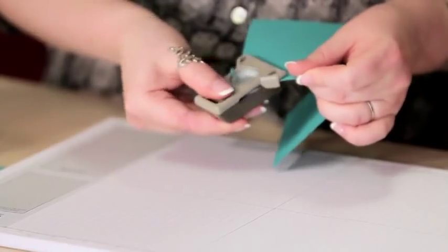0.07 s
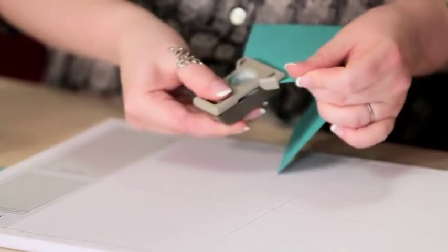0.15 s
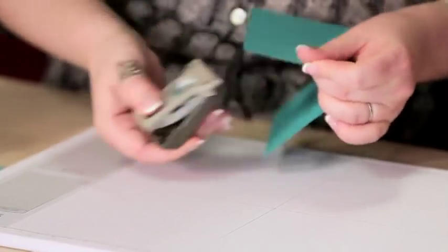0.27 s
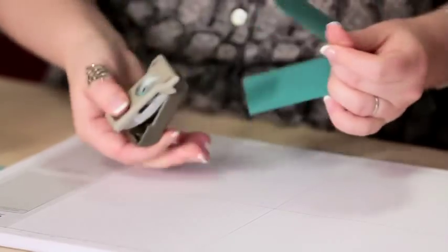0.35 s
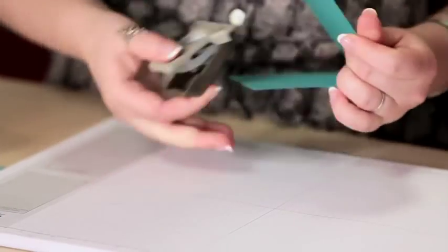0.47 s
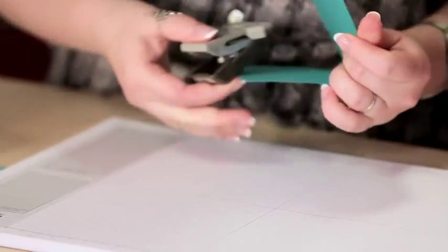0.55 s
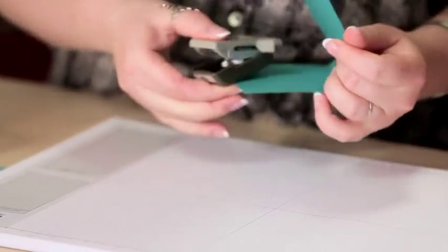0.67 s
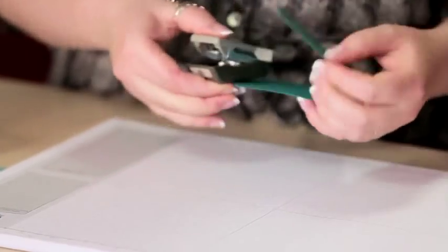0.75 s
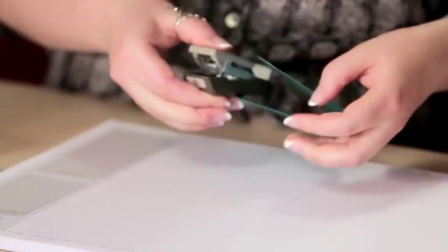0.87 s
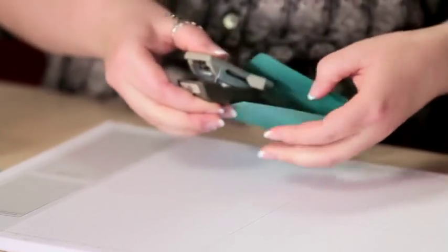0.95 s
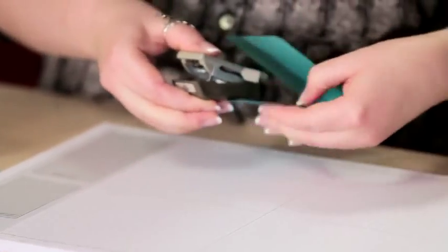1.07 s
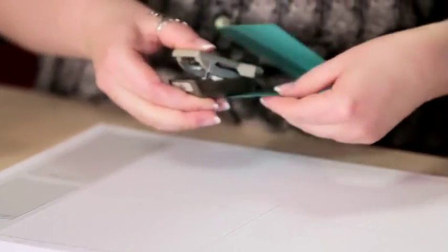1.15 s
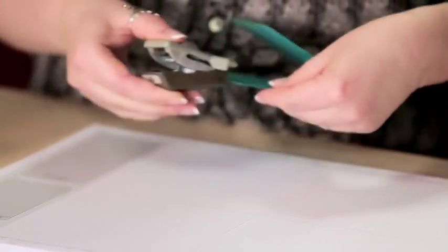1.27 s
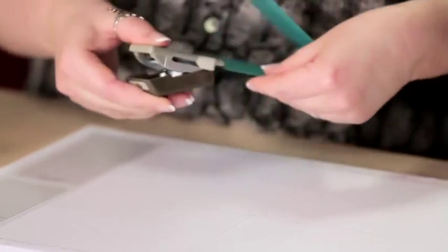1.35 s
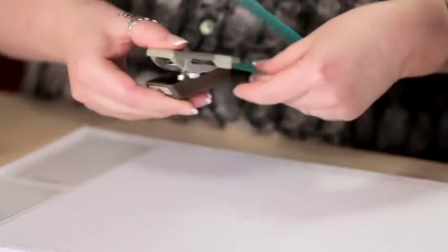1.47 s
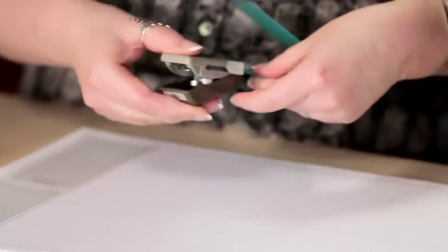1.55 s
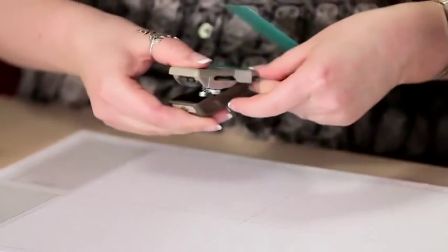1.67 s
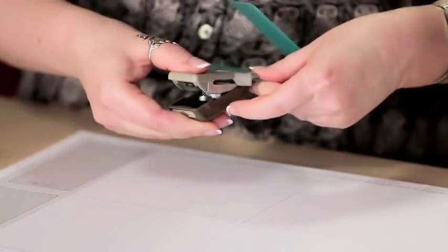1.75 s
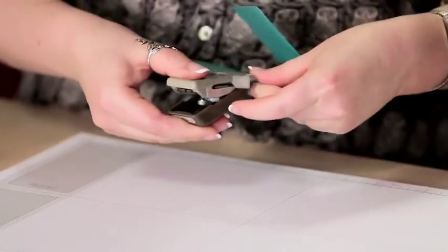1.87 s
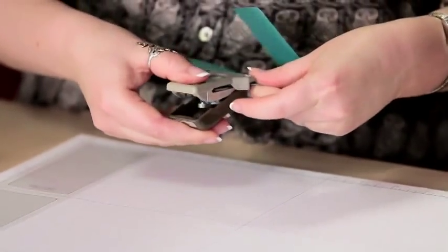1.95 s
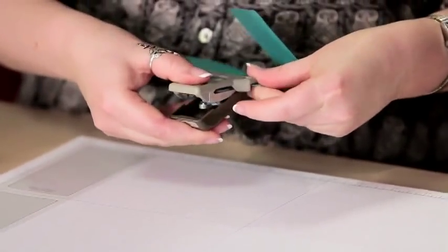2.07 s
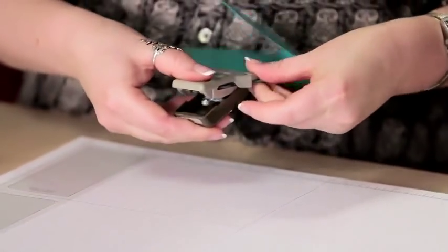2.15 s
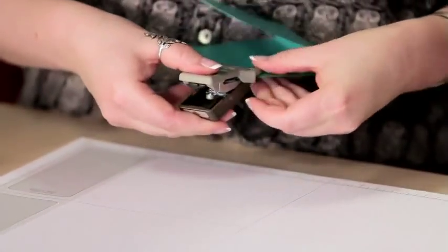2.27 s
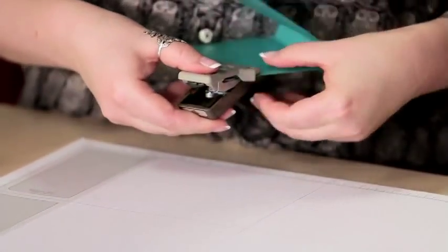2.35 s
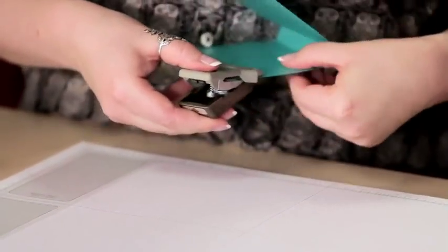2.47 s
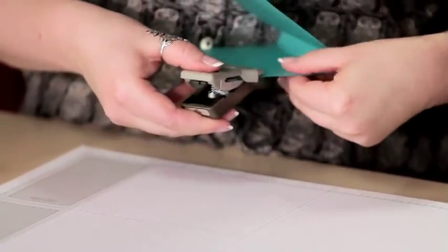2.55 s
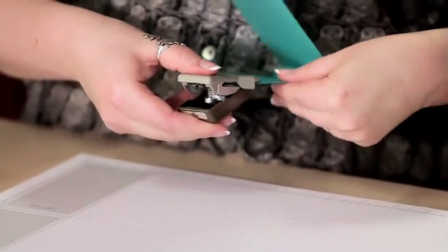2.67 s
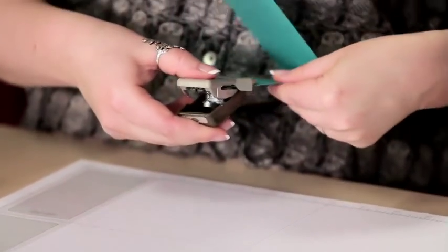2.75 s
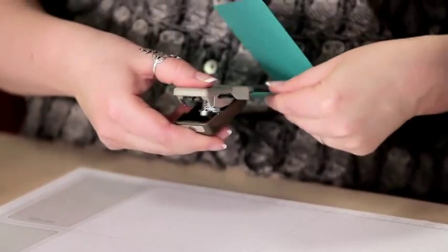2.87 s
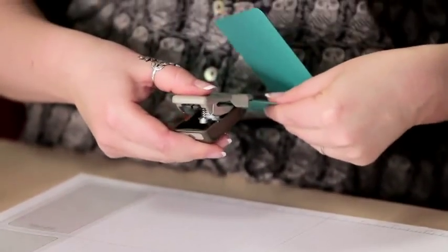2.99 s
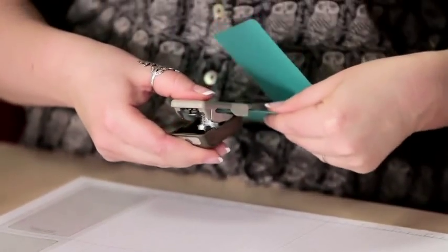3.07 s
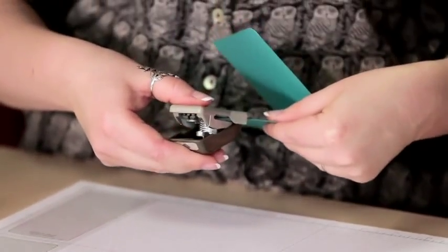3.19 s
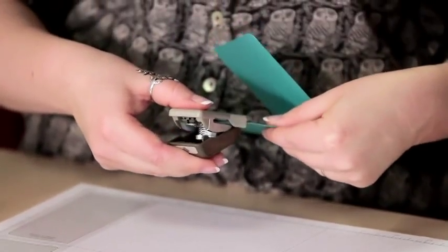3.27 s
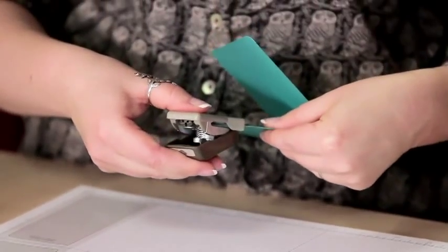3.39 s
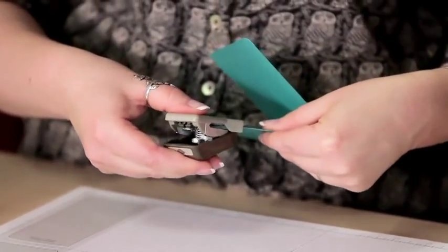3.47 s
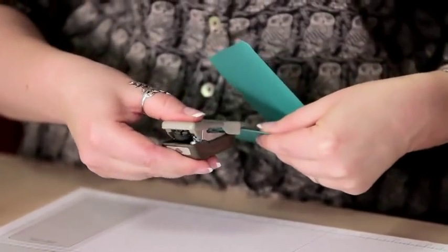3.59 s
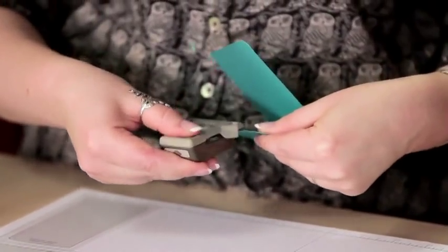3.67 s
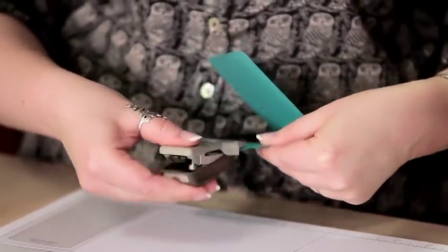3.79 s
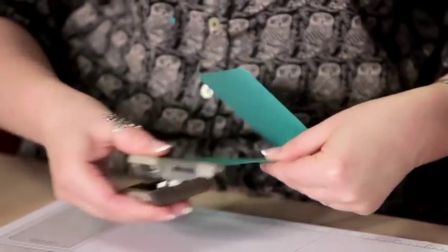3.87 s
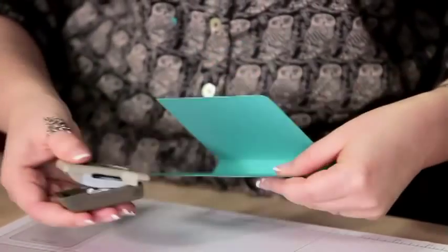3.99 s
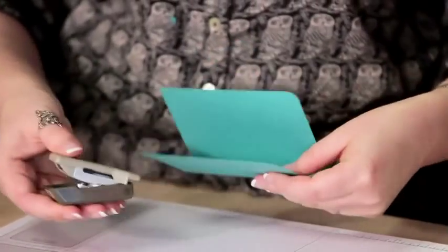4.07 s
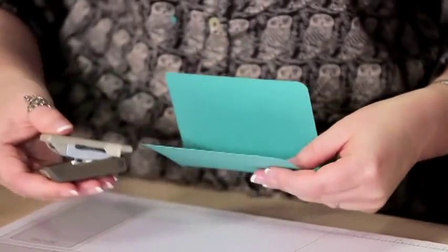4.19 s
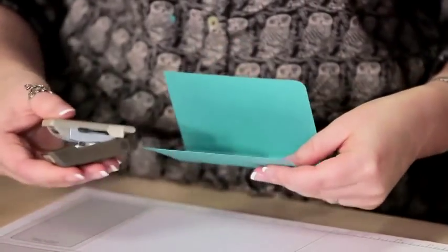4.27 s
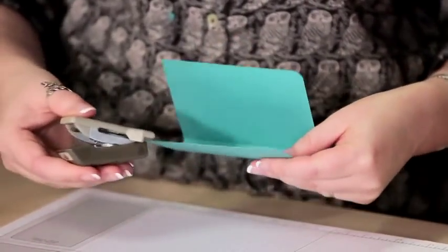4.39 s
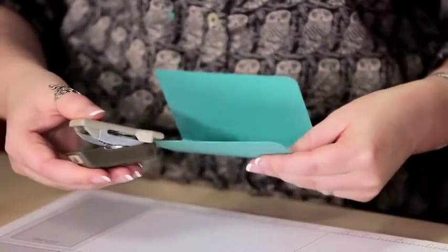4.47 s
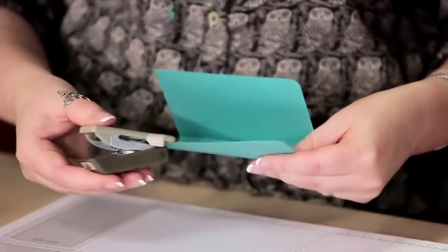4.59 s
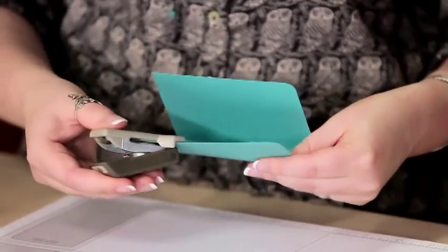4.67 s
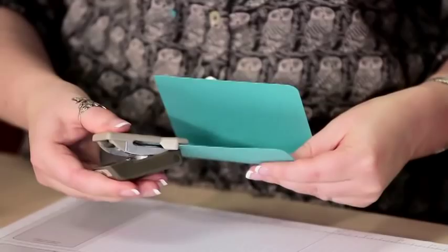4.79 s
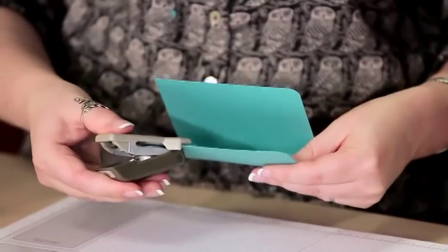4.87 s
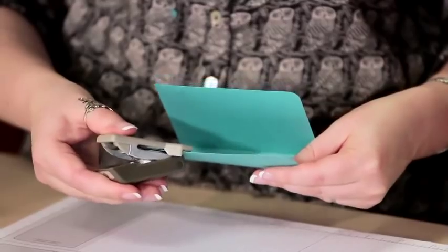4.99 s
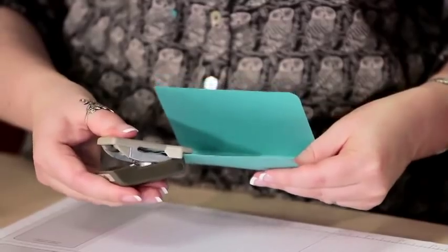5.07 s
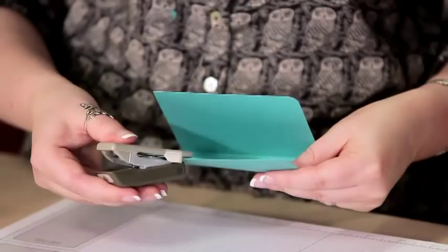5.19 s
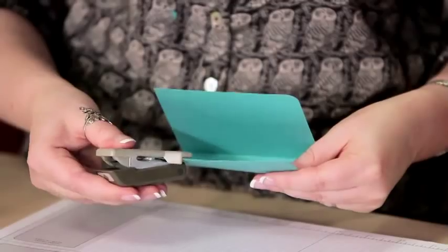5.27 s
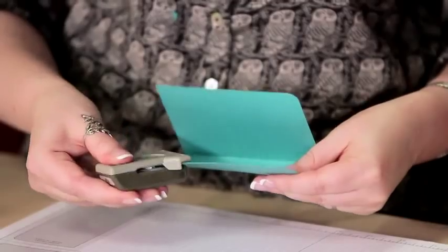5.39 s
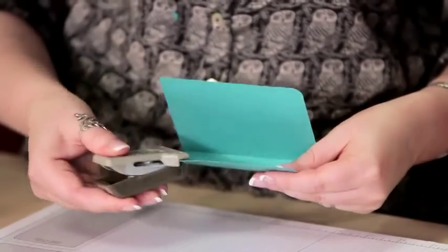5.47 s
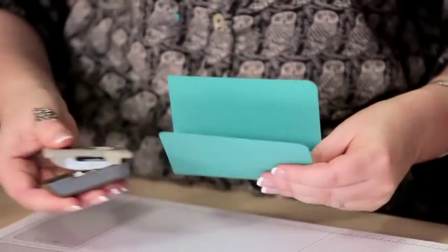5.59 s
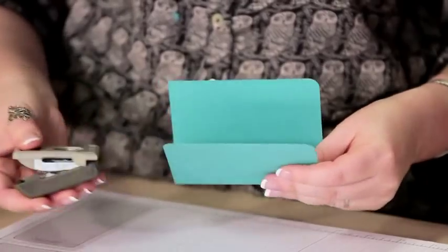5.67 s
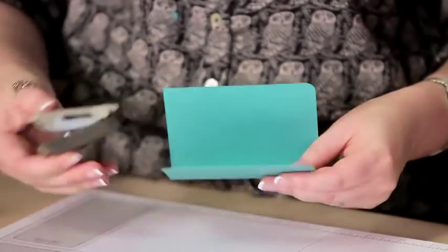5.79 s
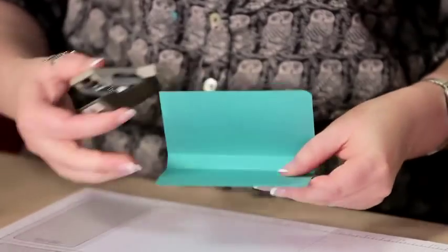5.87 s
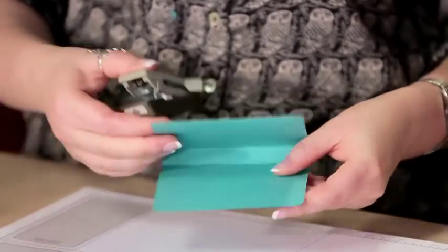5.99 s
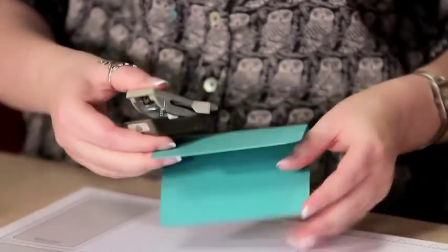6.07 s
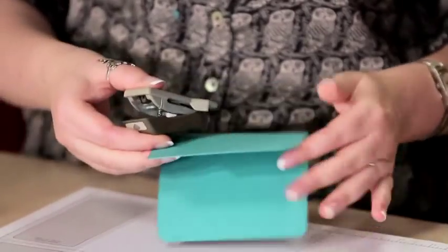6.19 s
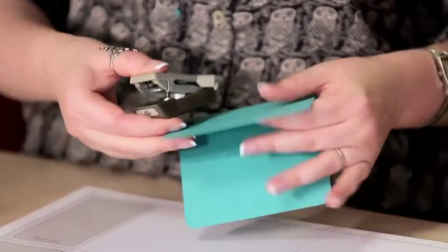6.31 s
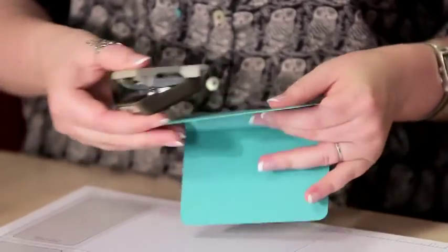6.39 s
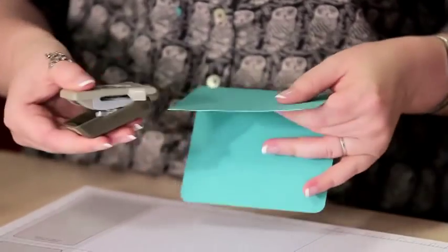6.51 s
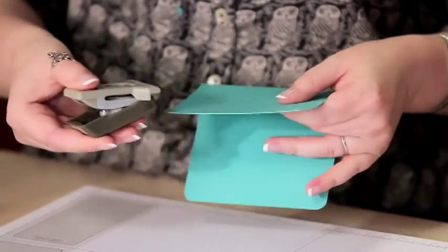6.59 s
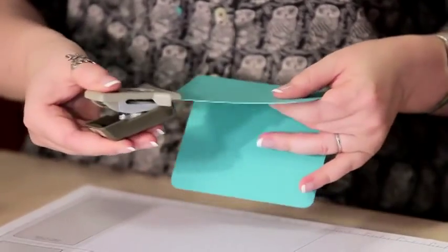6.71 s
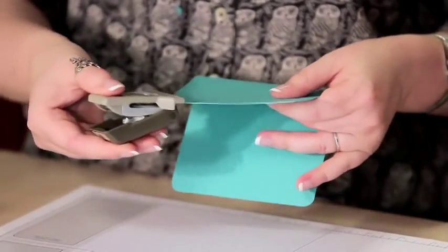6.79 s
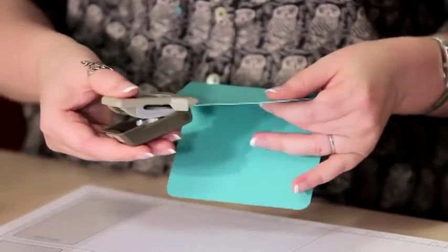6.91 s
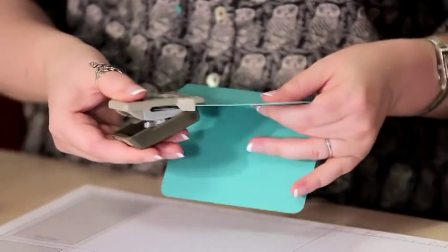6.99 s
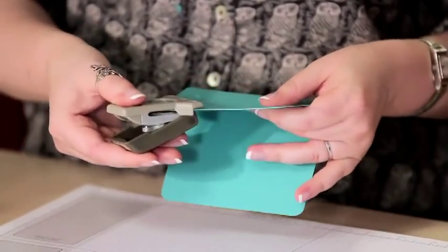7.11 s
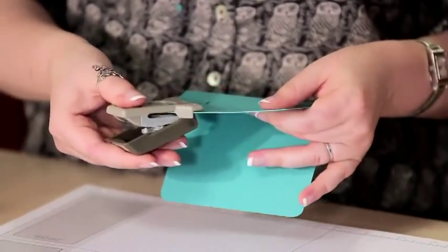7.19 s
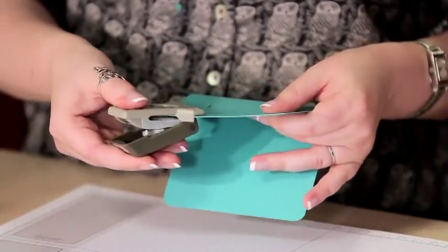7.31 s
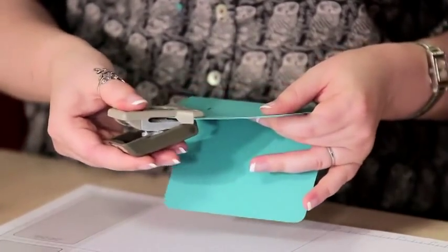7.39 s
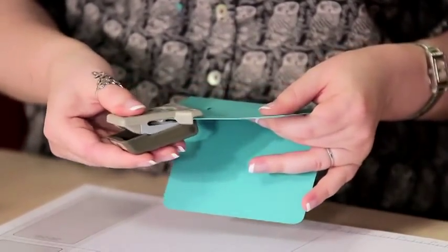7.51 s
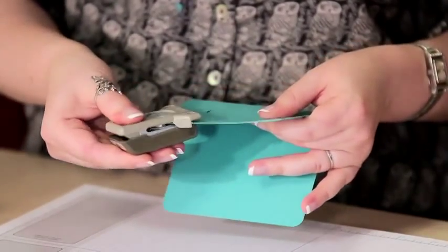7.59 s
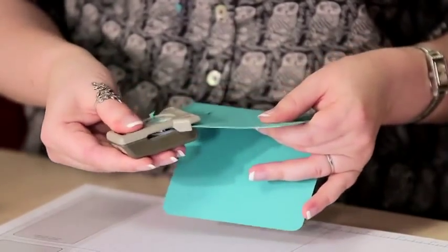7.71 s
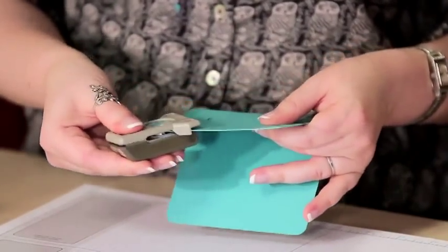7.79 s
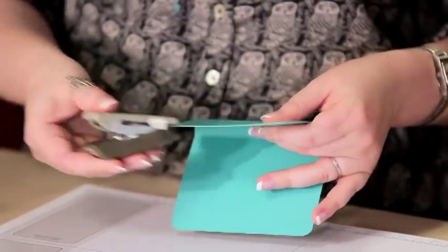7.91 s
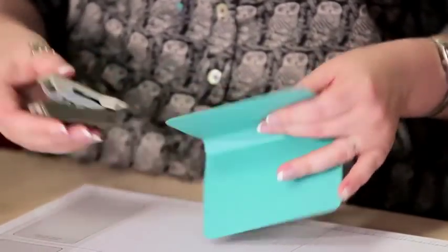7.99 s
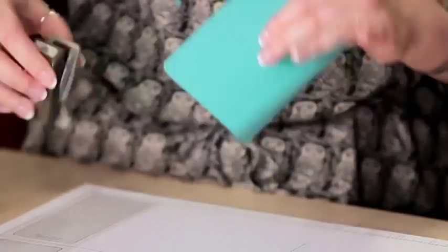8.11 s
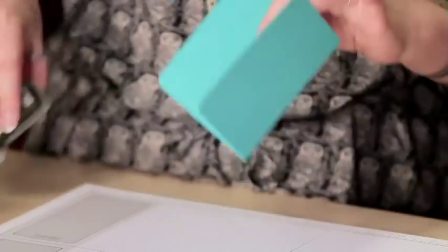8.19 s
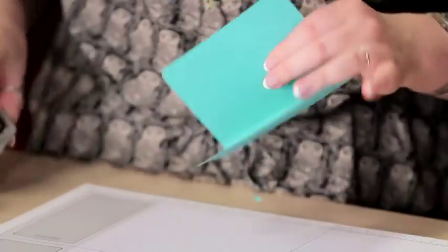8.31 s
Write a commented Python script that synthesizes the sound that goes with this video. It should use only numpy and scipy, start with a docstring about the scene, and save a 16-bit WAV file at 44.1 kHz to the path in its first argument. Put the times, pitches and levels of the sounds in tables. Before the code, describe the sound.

Very close in a quiet room, a small metal punch crunches and snaps at once, then card taps, scrapes and rustles softly in the hands. After a near-silent pause come a sharp single snap, later a two-stage crunch and the loudest snap, busier card knocking, and a last gritty cluster of cuts before quiet handling.

```python
"""A hand-held corner punch bites the corners off a folded card, close to the microphone in a quiet room.
The die crunches through the card and the lever snaps home: bursts of grit with a hard click ring the punch's modes.
Between cuts the card taps and the lever creaks (softer bursts); the card scrapes in the slot (clumped grit).
Fingers slide over the card (two bands of wavering noise) with small ticks.
Behind them lie a short room reverberation and a steady, low room tone."""
import sys
import numpy as np
from scipy import signal
from scipy.fft import rfft, irfft
from scipy.io import wavfile
from scipy.ndimage import uniform_filter1d

SR = 44100
rng = np.random.default_rng(int(sys.argv[2]) if len(sys.argv) > 2 else 0)


def digitize_waveform(pressure):
    """Quantize a signal to 16-bit integers and store it at the path in sys.argv[1].

    Rows of a 2-D input are taken as channels; values are limited to [-1, 1].
    """
    field = np.atleast_2d(pressure).T
    bounded = np.clip(field, -1, 1)
    quanta = np.round(bounded * 32767).astype(np.int16)
    wavfile.write(sys.argv[1], SR, quanta)


N = 368131   # length in samples


def from_db(db):
    """Gain of a level in dB."""
    return 10 ** (np.asarray(db) / 20)


def at_hz(points, hz):
    """Read a (Hz, value) table on a log-frequency axis."""
    table_hz, values = np.array(points).T
    return np.interp(np.log(hz), np.log(table_hz), values)


def rms_one(x):
    """Scale to rms 1."""
    return x / np.sqrt(np.mean(x ** 2) + 1e-20)


def grit(size, spread_db):
    """Dense tiny contacts of uneven strength."""
    return rng.standard_normal(size) * from_db(spread_db * rng.standard_normal(size))


def coloured(x, spectrum):
    """Give a signal the spectrum above 15 Hz; rms 1."""
    hz = np.maximum(np.fft.rfftfreq(N, 1 / SR), 1)
    gain = from_db(at_hz(spectrum, hz)) * (hz > 15)
    return rms_one(irfft(rfft(x) * gain, N))


def drift(rate_hz):
    """Slow random wandering with spread 1, drawn 200 times a second and smoothed."""
    steps = rng.standard_normal(int(N / SR * 200) + 2)
    lowpass = signal.butter(2, rate_hz, fs=200, output="sos")
    slow = rms_one(signal.sosfiltfilt(lowpass, steps))
    return np.interp(np.arange(N) / SR * 200, np.arange(len(slow)), slow)


def add(track, sound, at):
    """Mix a sound into the track from sample at."""
    track[at:at + len(sound)] += sound[:N - at]


# The punch in the hand with the card in it, as ringing modes.
# Each row: frequency in Hz before the grip shifts it, level in dB before the contact's colour,
# t60 in seconds at damping 1.
BODY = [(163, -7.5, 0.052), (293, -1, 0.016), (486, 1.5, 0.02), (745, -0.5, 0.014), (1110, -5, 0.014),
        (1604, 0.5, 0.0043), (1898, 1, 0.0073), (2237, -2.5, 0.0073), (2644, -1.36, 0.009),
        (2856, -5, 0.0069), (4066, -0.5, 0.0027), (5080, -3, 0.0029), (5844, -1.5, 0.0042),
        (7250, -2, 0.0036), (7726, -1, 0.0037), (9430, -7.5, 0.013), (10350, -6.5, 0.0055),
        (11640, -1.5, 0.00068), (13900, -4, 0.0017)]
# Where a contact's colour is set, in Hz: thud, bass, middle, edge, treble and top.
COLOUR_HZ = [400, 1100, 2300, 4600, 7600, 13000]
TREBLE_DB, TOP_DB = -3, -6   # relative to the brightness, which sets the edge
SPRING_HZ, SPRING_WIDTH_HZ = 7680, 840   # where the spring rings


def body(forces, colour, chance_db, damping):
    """Each mode rings on its own force and takes a share of the energy set by the colour of the contact."""
    thud_db, bass_db, bright_db, *spring_db = colour   # the spring is optional
    colour_db = [thud_db, bass_db, 0, bright_db, bright_db + TREBLE_DB, bright_db + TOP_DB]
    tilt = list(zip(COLOUR_HZ, colour_db))
    out = 0
    for k, (hz, db, t60) in enumerate(BODY):
        hz = hz * (1 + .025 * rng.standard_normal())   # the grip shifts each mode a little
        radius = from_db(-60 * damping / (t60 * SR))
        angle = 2 * np.pi * hz / SR
        ringing = signal.lfilter([1, 0, -1], [1, -2 * radius * np.cos(angle), radius ** 2], forces[k])
        spring_share = np.exp(-((hz - SPRING_HZ) / SPRING_WIDTH_HZ) ** 2)
        level_db = db + at_hz(tilt, hz) + spring_share * sum(spring_db) + chance_db * rng.standard_normal()
        sign = (-1) ** k
        out = out + sign * from_db(level_db) * rms_one(ringing)
    return out


def blows(rows, click_db, softening):
    """A burst of grit builds up to one hard click and dies away, the treble first."""
    out = np.zeros(N)
    before = 441   # samples ahead of the click
    ms = np.arange(-before, 2205) / SR * 1000
    quickness = (np.array(BODY)[:, :1] / 2300) ** softening   # higher modes lose their force sooner
    for s, peak_db, *colour, rise_ms, fall_ms in rows:
        rise = np.clip(1 + ms / np.clip(rise_ms, .2, 10), 0, 1)
        started = np.where(rise > 0, 1.1 + 0.2 * rise ** 2, 0)   # the first touch is abrupt
        shapes = started * np.exp(-quickness * np.maximum(ms, 0) / max(fall_ms, .2))
        force = grit(len(ms), spread_db=4) + from_db(click_db) * (ms == 0)
        sound = body(shapes * force + 1e-18, colour, chance_db=2, damping=1)
        add(out, from_db(peak_db) * sound / np.abs(sound).max(), round(s * SR) - before)
    return out


# Die biting the card, lever and spring letting go, close to the microphone.
# Each row: click in seconds, peak in dB, thud in dB, bass in dB, brightness in dB, spring ring in dB,
# build-up in ms, die-away in ms.
CRUNCHES = [(0.0525, -4.5, -27.5, -11.5, -11, 2.6, 5.4, 1.2), (3.798, -27.5, -33, -3.5, -16, 3, 6.2, 3.5),
            (3.815, -42, -16, -20.5, -10, 32.5, 5.8, 2.8), (5.3215, -6, -30, -22.5, -14.5, 10, 3.77, 2.2),
            (5.331, -15.5, -17.5, -6, -13, 1, 4.4, 4.1), (5.355, -20, -20, -1.5, -13, 6.5, 1.7, 1),
            (5.624, -40, -4, -9, 15, 4, 0.54, 2.67), (7.5935, -14.5, -21.5, -16, -14.5, 8.5, 3.3, 5.1),
            (7.6225, -16, -8.5, -8, -11.5, 16, 3, 1.3), (7.668, -35.5, -12, -13, -12, 1.5, 5, 4.2),
            (7.6925, -13.5, -43, -1, -22, -4, 3.1, 2.4), (7.845, -16, -11.5, 2.5, -22, -3, 3.3, 1.6),
            (7.8532, -10.5, -13.5, 4, -6, 2, 0.78, 1.5)]
# Lever slamming onto its stop, close to the microphone.
# Each row: click in seconds, peak in dB, thud in dB, bass in dB, brightness in dB, spring ring in dB,
# build-up in ms.
SNAPS = [(0.0729, -2.5, -26.5, -24.5, -12.5, 2.5, 0.77), (3.6549, -2, -24, -14, -12.5, 11, 3.7),
         (5.3573, 1, -17, -8.5, -5.5, 5.6, 0.82), (7.695, -3, -12, -9.5, -4.5, 3, 2.27)]
SNAP_FALL_MS = 1.7
BOUNCE_S, BOUNCE_DB, BOUNCE_BASS_DB = .008, -21.5, 14   # delay, peak and bass relative to the slam


def lever():
    """The die crunches, then the lever slams home and bounces once, duller and without the spring."""
    slams = [(*row, SNAP_FALL_MS) for row in SNAPS]
    bounces = []
    for s, db, thud, bass, bright, *_ in SNAPS:
        colour = (thud, bass + BOUNCE_BASS_DB, bright)
        bounces.append((s + BOUNCE_S, db + BOUNCE_DB, *colour, 2.1, 2.1))   # build-up, die-away in ms
    return blows(CRUNCHES + slams + bounces, click_db=19.5, softening=.1)


TAP_RISE_MS = 1   # build-up of taps, creaks and ticks
# The lever creaking faintly under the thumb, close to the microphone.
# Each row: click in seconds, peak in dB.
CREAKS = [(0.032, -36), (3.601, -49), (3.624, -53.5), (5.023, -43.5), (5.052, -46), (5.098, -49.5),
          (5.256, -48.5), (5.289, -47.5), (5.298, -53), (7.297, -49.5), (7.568, -50)]
CREAK_COLOUR, CREAK_FALL_MS = (-23.5, -13.5, -15), 1.9   # colour: thud, bass, brightness in dB


def creaks():
    """The lever creaks: faint, brief contacts of one dull colour ring the punch."""
    rows = [(s, db, *CREAK_COLOUR, TAP_RISE_MS, CREAK_FALL_MS) for s, db in CREAKS]
    return blows(rows, click_db=17, softening=0.23)


# Card edge or finger knocking on the punch, close to the microphone.
# Each row: click in seconds, peak in dB, thud in dB, bass in dB, brightness in dB, die-away in ms.
TAPS = [(0.179, -34, -2, 4.5, 0.5, 5.3), (0.258, -31, 7.5, 13, -6, 10.5), (0.564, -29, -7, -4, -8, 3.5),
        (0.74, -35.5, -48, -2, -12, 4.6), (0.775, -34, -24, -12, -17, 11), (0.823, -25, -24, -13, -13, 4.8),
        (0.841, -16.5, -12.5, -5.5, -6, 4.5), (0.993, -34, -19, -36, -10.5, 8.3),
        (1.02, -30.5, -7, -35, -9.5, 4.6), (1.032, -29.5, -12, -17, -11.5, 4.3),
        (1.069, -41, -19, -25, -8, 9.6), (1.11, -20.5, -27.5, -12, -9.5, 4.2), (1.12, -26, -5, -23, 0, 3.9),
        (1.146, -34, -11, -7, -16, 1.7), (1.236, -24, -13, -15, -13, 3.4), (1.244, -28.5, -7, -9, -15, 3),
        (1.283, -39, -21, -2, 3, 7), (1.495, -35, -9, -18, -13, 8.4), (1.553, -35, -30, -9, -8, 7.1),
        (1.767, -43.5, 17, 24, 5, 8.9), (1.936, -40.5, -6, 2, -7, 6.1), (2.183, -34.5, -13, -34, -3, 27),
        (2.273, -33, -36, 2, -11, 8.2), (2.285, -28, -23, 5, -22, 5.4), (2.39, -36, -19, -10, -9, 5.1),
        (2.479, -33, -6, -3, -23, 8.4), (2.756, -43, -7, 1.5, -7, 2.6), (2.851, -36.5, -2, 9, -9, 3.5),
        (3.05, -39.5, -16, 2, -7, 15.3), (3.162, -49.5, -17, -3, -6, 14), (3.265, -47.5, -20, -8, -5, 6.7),
        (3.372, -47, -14, 3, 1, 4.4), (3.564, -45.5, -22, -5, -5, 7), (4.138, -47.5, -27, -18, -11, 11),
        (4.401, -37, -23, -7, -18, 16), (4.684, -23, -5, 2, -40, 5.5), (5.799, -44, -14, -13.5, -7, 6.6),
        (5.986, -41, -12, -8.5, -13, 15), (6.021, -38.5, 4.5, -16, -9, 12), (6.116, -38.5, 7, -9, 3, 6.6),
        (6.143, -22, 1, 8, 2.2, 8.1), (6.178, -37, 14, -11, -3, 2.9), (6.255, -26, 5.5, 3, -1, 3.4),
        (6.272, -34, 6, 0, -2, 8.7), (6.347, -28.5, -2.5, 1.5, -2, 12), (6.365, -33, 1, -26, -10, 11),
        (6.388, -38, 0, -9, -8, 5.7), (6.425, -32, 2.5, -7, -9.5, 6), (6.471, -35.5, 3, 6, -7, 7.4),
        (6.482, -33, 2, 9.5, -3, 3.2), (6.52, -41, -19, 5, -3, 14), (6.705, -43.5, -9.5, 10, -6, 1.4),
        (6.745, -28, -10, 7, -12, 2.9), (6.968, -35.5, -1, -1, -3, 10), (6.981, -18, 6.5, 15, -7, 4.7),
        (7.092, -45.5, -8, -9, -25, 2.3), (7.108, -39, -10, -19, -3, 5.4),
        (7.159, -45, -11, -14.5, -5.5, 4), (7.257, -46, -7, -6, -4, 12), (7.822, -39, -20, 7, -8, 21),
        (8.25, -56, -9, -7, 17, 2.5), (8.269, -60, -12, -8, 5, 2.5), (8.292, -37, -5, -9, 28, 2.5),
        (8.318, -44, 4, -2, 3, 3.5)]


def taps():
    """Card and fingers knock on the punch: short contacts, each with its own colour and die-away."""
    rows = [(*row[:-1], TAP_RISE_MS, row[-1]) for row in TAPS]
    return blows(rows, click_db=17, softening=0.23)


# Card dragged in the slot or over a hand, close to the microphone.
# Each row: start in seconds, length in seconds (the drag stops by 0.204), rms in dB over that length,
# swell in dB, thud in dB, bass in dB, brightness in dB.
SCRAPES = [(0.218, 0.054, -33.5, 1, -22, -5, 9), (0.29, 0.4, -64, 0, -30, -25, 1),
           (0.681, 0.11, -53, 11, -42, -4, -1), (0.818, 0.015, -36, 3, -36, -21, -16),
           (0.86, 0.117, -56, 2.5, -34, -24, -8), (1.033, 0.066, -51.5, -5, -22, -20, -10),
           (1.122, 0.077, -54.5, -4, -26, -22, -2), (1.293, 0.064, -55, -1, -36, -42, -12),
           (1.363, 0.035, -57, -10, -37, -35, -13), (1.501, .15, -51.5, 7, -13.5, -4.5, -2),
           (2.069, 0.19, -54, -3, -17, -4.5, -7), (2.359, 0.17, -52, -1, -15, -11, -8.5),
           (2.577, 0.1, -51.5, -1, -39, -2.5, -3), (2.662, .09, -58, -4, -20, 1, -6),
           (3.863, 0.055, -39.5, 8, -24, -0.5, -6), (3.931, 0.19, -59.5, 0.5, -29, -12, -8),
           (4.564, 0.11, -50.5, 21, -24, 2.5, -8.5), (4.644, 0.0422, -41, -4.5, -21, 4.5, -9),
           (5.546, 0.055, -41.5, 0, -19, -9, -8.5), (6.034, .083, -58, -0.5, -11, -27, 3),
           (6.207, .04, -50, 2, -4, 1, -2), (6.716, 0.031, -51, -8, 6, 14.5, 5),
           (6.853, 0.15, -54, 0, -6.5, -1.5, -16), (7.928, 0.038, -39, 5.5, -13, -5.5, -5)]
# The cut card shivering in the slot after each slam: level relative to the slam's peak.
SHIVER_S, SHIVER_DB, SHIVER_FADE_DB = 0.19, -52, -25.5
SHIVER_COLOUR = (-23.5, -12, -3)   # thud, bass, brightness in dB


def scrapes():
    """The card catches and slips: grit in uneven clumps whose colour shifts, the modes damped by the contact."""
    out = np.zeros(N)
    t = np.arange(9000) / SR
    steps = np.arange(30) * .008
    shivers = [(s + BOUNCE_S, SHIVER_S, db + SHIVER_DB, SHIVER_FADE_DB, *SHIVER_COLOUR, spring / 2)
               for s, db, *_, spring, _rise in SNAPS]
    for s, length, db, swell_db, *colour in SCRAPES + shivers:
        fade_in = np.clip(t / (0.047 * length), 0, 1)
        fade_out = np.clip((length - t) / (0.22 * length), 0, 1)
        swell = from_db(swell_db * np.minimum(t / length, 1))
        stroke = fade_in * fade_out * swell * grit(len(t), spread_db=3.5)
        shared = rng.standard_normal(len(steps))
        # neighbouring modes slip together, distant ones apart
        own = uniform_filter1d(rng.standard_normal((len(BODY), len(steps))), size=4, axis=0)
        clumps = [from_db(np.interp(t, steps, 3 * shared + 6 * row)) for row in own]
        forces = [stroke * clump + 1e-18 for clump in clumps]
        sound = body(forces, colour, chance_db=1.5, damping=1.3)
        rms = np.sqrt(np.sum(sound ** 2) / (length * SR))
        add(out, from_db(db) * sound / rms, round(s * SR))
    return out


# How hard the fingers slide on the card, close to the microphone.
# Each row: time in seconds, level of the middle in dB before it wavers.
RUB = [(0.0, -68), (.08, -61), (.2, -53.5), (.6, -63.5), (.66, -62), (.9, -60.5), (1.15, -61),
       (1.33, -69.5), (1.97, -64.5), (2.2, -61.5), (2.5, -60.5), (2.86, -72), (3.6, -76), (3.83, -63),
       (4.1, -76), (4.55, -63.5), (4.75, -73), (5.33, -75), (5.44, -57.5), (5.6, -57.5), (5.75, -72.5),
       (6.05, -61), (6.5, -65.5), (6.75, -73), (6.95, -60.5), (7.351, -76), (7.66, -74), (7.75, -59),
       (8.07, -60.5), (8.35, -68.5)]
# Middle of the sliding. Each row: frequency in Hz, relative level in dB per Hz.
RUB_LOW = [(300, -12), (900, -7.5), (1550, -5), (2300, -2.5), (3100, -6.5), (5500, -20)]
# Hissy top of the sliding. Each row: frequency in Hz, relative level in dB per Hz.
RUB_HIGH = [(3000, -19), (4500, 4), (8000, 0), (12000, -10.5), (16000, -16)]
RUB_HISS_DB = -6.5   # the hissy top relative to the middle


def rubbing():
    """Skin and card sliding: soft grit with a card-like middle and a hissy top, both wavering together."""
    level_db = np.interp(np.arange(N) / SR, *np.transpose(RUB))
    level = from_db(level_db + 2.0 * drift(rate_hz=24))
    middle = coloured(grit(N, spread_db=5.5), RUB_LOW)
    hiss = coloured(grit(N, spread_db=8.0), RUB_HIGH)
    return level * (middle + from_db(RUB_HISS_DB) * hiss)


TICK_DB, TICK_SPREAD_DB = 15, 3   # peak over the sliding level, and its spread
TICK_COLOUR, TICK_FALL_MS = (-12, -7, -4.5), 3.4   # colour: thud, bass, brightness in dB


def ticks(count):
    """Small contacts at random moments ring the punch, stronger where the fingers slide hard."""
    moments = rng.uniform(.02, .99, count) * N / SR
    sliding_db = np.interp(moments, *np.transpose(RUB))
    peaks_db = sliding_db + TICK_DB + TICK_SPREAD_DB * rng.standard_normal(count)
    rows = [(s, db, *TICK_COLOUR, TAP_RISE_MS, TICK_FALL_MS) for s, db in zip(moments, peaks_db)]
    return blows(rows, click_db=17, softening=0.23)


# How long the quiet room rings. Each row: frequency in Hz, t60 in seconds.
ROOM_T60 = [(200, 0.19), (1200, 0.45), (2300, 0.11), (4000, 0.16), (12000, 0.25)]
ROOM_DB = -20   # reverberation relative to the near sound


def room(x):
    """Reverberation: noise that dies band by band, after a short gap."""
    t = np.arange(SR // 2) / SR
    tail = 0
    edges = 125 * 2 ** np.arange(0, 7.1, .5)   # half-octave bands
    for low_hz, high_hz in zip(edges, edges[1:]):
        band = signal.butter(2, [low_hz, high_hz], "band", fs=SR, output="sos")
        dying = from_db(-60 * t / at_hz(ROOM_T60, np.sqrt(low_hz * high_hz)))
        tail = tail + signal.sosfilt(band, rng.standard_normal(len(t))) * dying
    tail = tail * np.clip((t - .003) / 0.0034, 0, 1)
    tail = tail / np.sqrt(np.sum(tail ** 2))
    return from_db(ROOM_DB) * signal.fftconvolve(x, tail)[:N]


# Tone of the quiet room. Each row: frequency in Hz, relative level in dB per Hz.
AIR = [(12, -42.5), (20, -15.5), (49, 3.5), (108, -2), (297, -11.5), (452, -14), (709, -19), (888, -18.5),
       (1690, -30), (3520, -38.5), (12500, -38), (15200, -45), (16500, -67.5)]
AIR_DB = -56.5   # rms


def room_tone():
    """Steady noise, strongest in the low bass."""
    return from_db(AIR_DB) * coloured(rng.standard_normal(N), AIR)


def scene():
    """Punch, card and fingers, their room, and the room tone."""
    near = lever() + creaks() + taps() + ticks(count=45) + scrapes()
    return (near + room(near) + rubbing() + room_tone())[None]


TOP_LEVEL = .93   # the recorder rounds peaks below this, before the thump is added
THUMP_DB = -8.0   # gain of the rectified lows
CUTOFF_HZ = 16800   # stopband edge


def record(dry):
    """Rectified sound leaves a low thump under the loud contacts; peaks are rounded and the top is cut."""
    thump_band = signal.butter(1, [28, 70], "band", fs=SR, output="sos")
    thump = signal.sosfilt(thump_band, np.abs(dry))
    thump = signal.sosfilt(signal.butter(1, 25, "high", fs=SR, output="sos"), thump)
    rounded = dry / (1 + np.abs(dry / TOP_LEVEL) ** 4) ** .25
    top_cut = signal.cheby2(12, 60, CUTOFF_HZ, fs=SR, output="sos")
    return signal.sosfilt(top_cut, rounded + from_db(THUMP_DB) * thump)


dry = scene()
out = record(dry)
digitize_waveform(out)
```